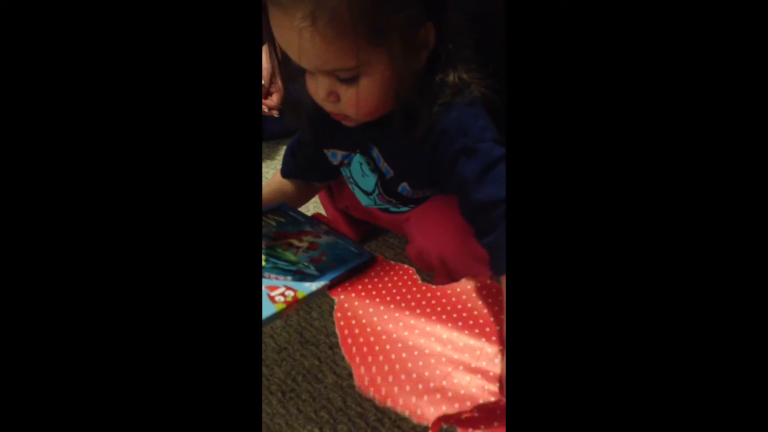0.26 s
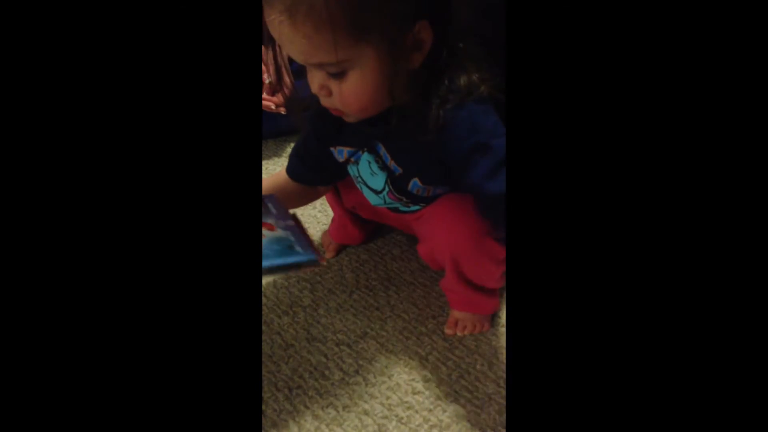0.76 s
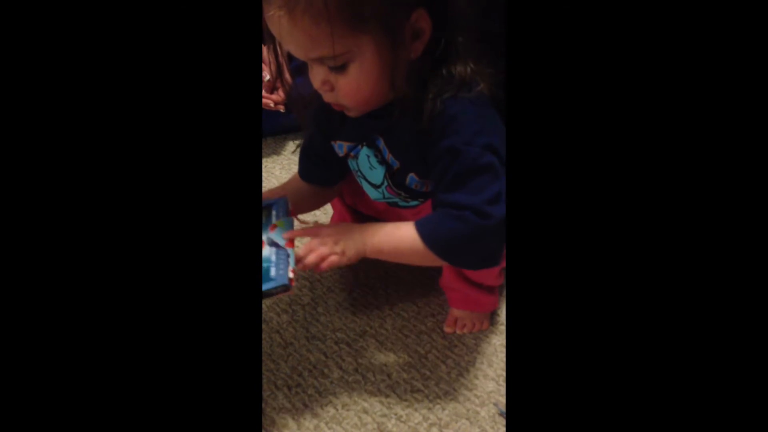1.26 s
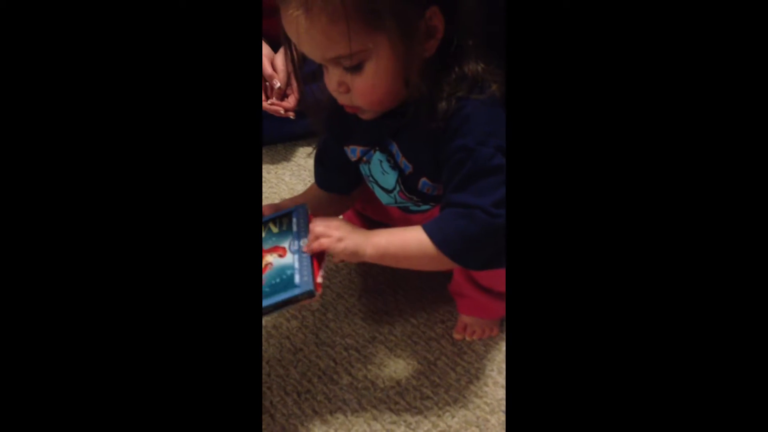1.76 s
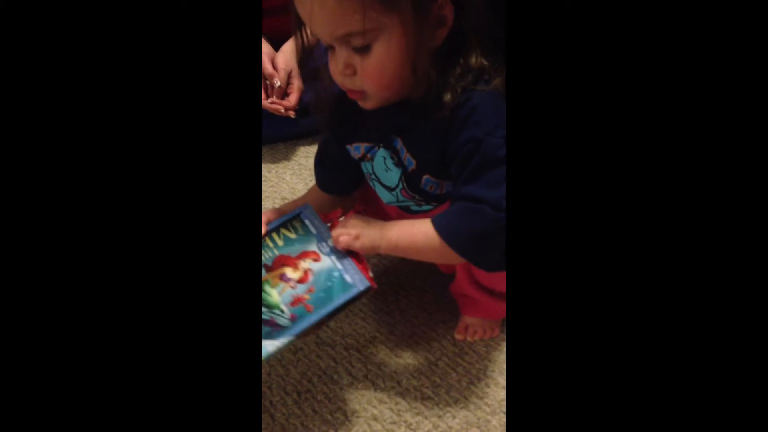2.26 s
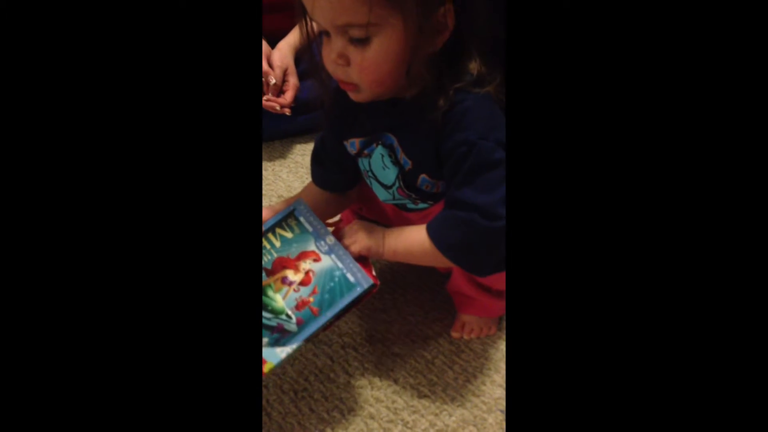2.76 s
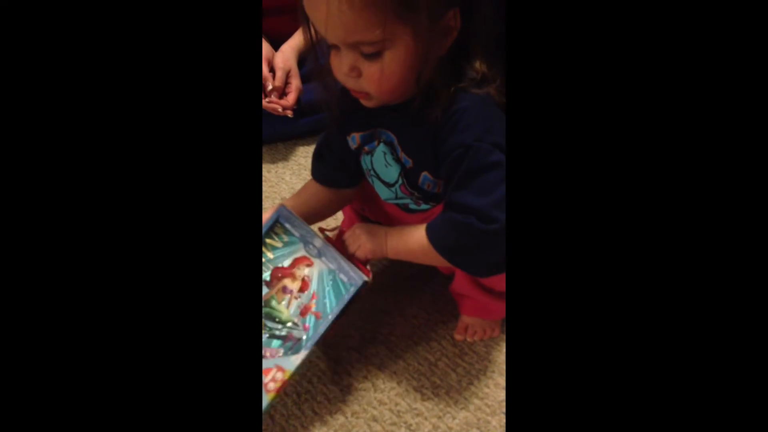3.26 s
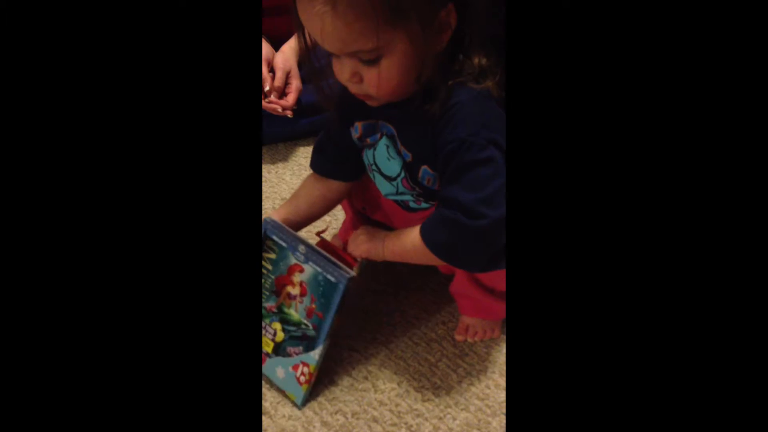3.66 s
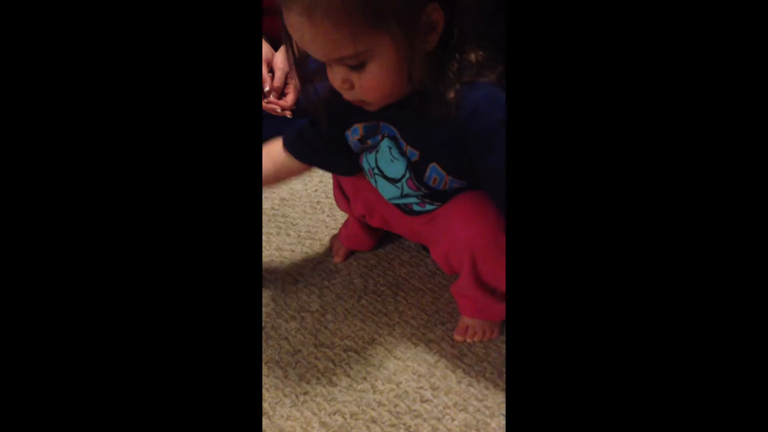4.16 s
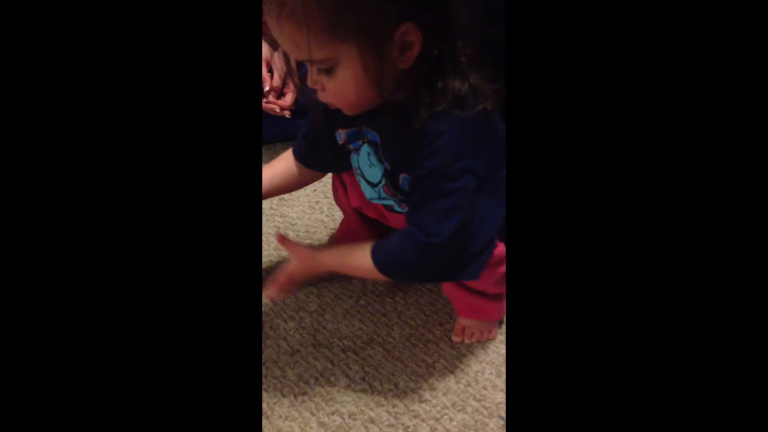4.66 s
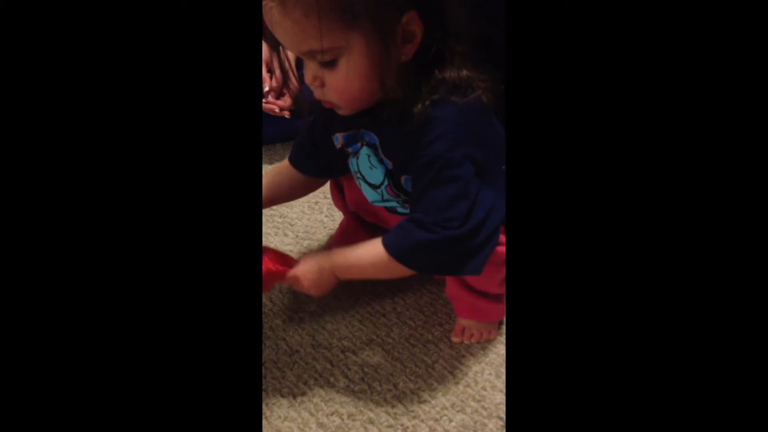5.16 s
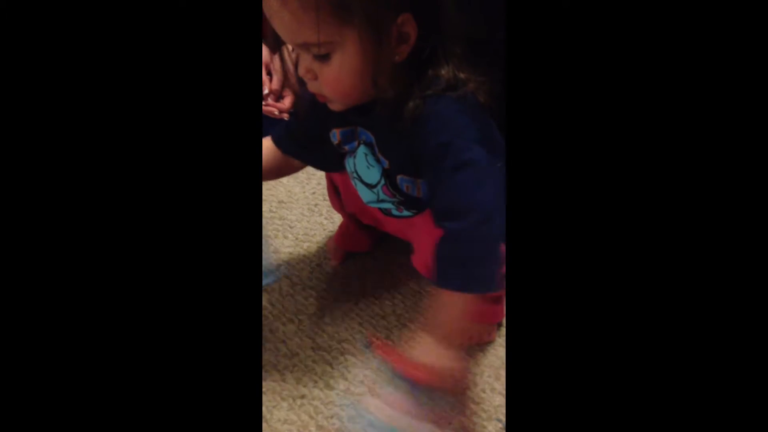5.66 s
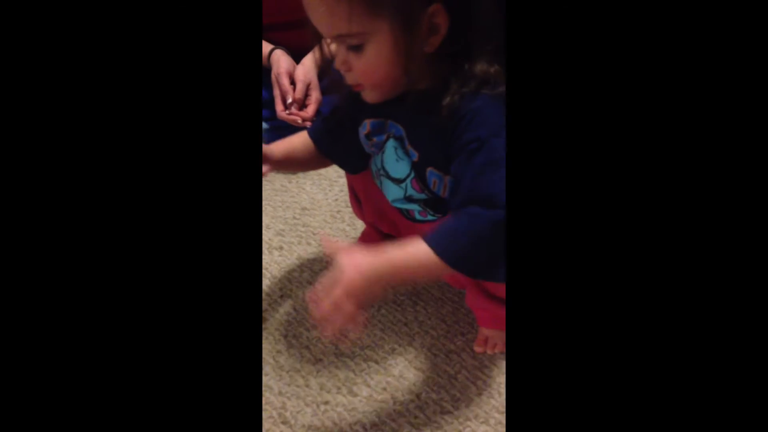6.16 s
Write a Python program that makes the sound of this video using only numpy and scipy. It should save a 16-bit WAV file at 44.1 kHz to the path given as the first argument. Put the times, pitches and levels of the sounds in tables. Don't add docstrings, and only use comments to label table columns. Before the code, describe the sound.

A quiet carpeted room with little echo, heard close on a phone: soft low appliance hum and faint hiss throughout. At 0.2 s a crease snaps, then at 0.3 s a very short, sharp paper rip with a dull box knock, over by 0.4. Near silence follows with tiny finger ticks; around 1.3 to 1.8 a soft low rumble of weight shifting on the floor. Crisp single snaps at 2.1 and 2.5, then a scatter from 2.9 to 3.8, the strongest near 3.2. At 3.9 to 4.05 comes a dense, bright tear with hollow thuds and a flapping sheet. Faint crinkles and ticks continue, with clearer snaps at 4.9 and 5.1. Two rips follow at 5.3 to 5.4 and 5.5 to 5.6, crackling and papery. Small taps and a low floor rumble near 5.8 fade, with one last snap at 6.1.

```python
import sys
import numpy as np
from scipy import signal
from scipy.fft import rfft, irfft
from scipy.io import wavfile
from scipy.ndimage import uniform_filter1d

SR = 44100
rng = np.random.default_rng(int(sys.argv[2]) if len(sys.argv) > 2 else 0)


def ratio_of_db(decibels):
    return 10 ** (np.asarray(decibels, float) / 20)


def wav_out(sig):
    wavfile.write(sys.argv[1], SR, np.round(np.clip(np.atleast_2d(sig).T, -1, 1) * 32767).astype(np.int16))


N = 283122
FIRM_DB = -35


def evened(x):
    return x / np.sqrt(np.mean(x ** 2) + 1e-20)


def read(points, hz):
    point_hz, value = np.transpose(points)
    return np.interp(np.log(hz + 1), np.log(point_hz + 1), value)


def add(mix, start_s, sound):
    part = mix[round(start_s * SR):][:len(sound)]
    part += sound[:len(part)]


def ring(x, hz, width_hz):
    radius = np.exp(-np.pi * width_hz / SR)
    return signal.lfilter([1 - radius], [1, -2 * radius * np.cos(2 * np.pi * hz / SR), radius ** 2], x)


def pull(t, start_s, rise_s, peak_db, swell_db, fade_s):
    u = t - start_s
    swelling = peak_db - swell_db * (1 - u / rise_s)
    fading = peak_db - 60 * (u - rise_s) / fade_s
    db = np.where(u < rise_s, swelling, fading)
    return np.where(u < 0, -200, np.maximum(db, -200))


# frequency in Hz, level in dB per Hz.
PAPER_SPECTRUM = [(71, -62), (120, -2.5), (498, -3.5), (748, -4.5), (881, -11), (1020, -7.5), (1320, -14.5),
                  (1650, -13), (2030, -6), (3970, -9.5), (5610, -8.5), (7010, -1), (8950, -14),
                  (12600, -25.5), (15500, -44)]


def paper_part(lo_hz, hi_hz):
    hz = abs(np.fft.fftfreq(4096, 1 / SR)) + 1
    slopes = (1 + (lo_hz / hz) ** 6) * (1 + (hz / hi_hz) ** 6)
    log_gain = np.log(ratio_of_db(read(PAPER_SPECTRUM, hz)) / np.sqrt(slopes) + 1e-5)
    phase = -signal.hilbert(log_gain).imag
    taps = np.fft.ifft(np.exp(log_gain + 1j * phase)).real[:2048]
    return taps / np.linalg.norm(taps)


def paper_parts():
    crackle = paper_part(4500, 9000)
    crackle = evened(crackle) + 0.5 * evened(ring(crackle, 7200, 970))
    sheet = paper_part(1200, 4500)
    box = paper_part(190, 1200)
    finest = signal.lfilter([1, -1.2, 0.6], [1], paper_part(9000, 30000))
    return [part / np.linalg.norm(part) for part in (crackle, sheet, box, finest)]


def breaks(per_s, spread_db, clump_db, clump_s):
    breaking = rng.random(N) < per_s / SR
    sign = rng.standard_normal(N)
    size = np.minimum(rng.exponential(1, N), 3)
    clump = evened(signal.lfilter([1], [1, -np.exp(-1 / (clump_s * SR))], rng.standard_normal(N)))
    return evened(breaking * sign * ratio_of_db(spread_db * size + clump_db * clump))


def through_paper(levels_db, per_s, spread_db, clump_db, clump_s, patchy_db):
    out = np.zeros(N)
    fibres = breaks(per_s, spread_db, clump_db, clump_s)
    for part, db in zip(paper_parts(), levels_db):
        signs = rng.choice([-1., 1.], N)
        out += signal.oaconvolve(fibres * signs * ratio_of_db(db), part)[:N]
    z = signal.stft(out, nperseg=128)[2]
    patches = uniform_filter1d(rng.standard_normal(z.shape), size=3, axis=0)
    patches = evened(uniform_filter1d(patches, size=7, axis=1))
    return signal.istft(z * ratio_of_db(patchy_db * patches), nperseg=128)[1][:N]


# start in seconds, pull in seconds, peak in dB, swell in dB, fade in seconds per 60 dB.
RIP_PULLS = [(.309, .022, -33.5, 0, 0.03), (0.33, .037, -25, 3, 0.01), (.369, .004, -39, 0.6, 0.0747),
             (2.043, .004, -59, 0.6, 0.2), (2.47, .038, -48.5, 17, 0.05), (3.847, .004, -45, 4, 0.25),
             (3.862, 0.018, -44, 9, 0.16), (3.893, .008, -28.5, 3, .08), (3.905, .108, -26, 6.5, .085),
             (4.198, .02, -54, 9, 0.18), (5.12, .018, -45, 25, 0), (5.309, .004, -31.5, -2, 0.09),
             (5.355, 0.066, -42.5, -2, 0.16), (5.505, .042, -27.5, 16, 0.1446),
             (5.609, .012, -32, 3.5, 0.077)]
# start in seconds, time to peak in seconds, peak in dB, swell in dB, fade in seconds per 60 dB.
SHEET_FLAPS = [
    (.33, 0.033, -36, 3, 0.07),
    (2.045, 0.023, -55.5, 1, 0.16),
    (3.9, 0.017, -31, 4, 0.1958),
    (3.939, 0.073, -33, 0, 0.1129),
    (4.05, .006, -49, 5, 0.08),
    (5.135, 0.019, -53, 2, 0.17),
    (5.292, 0.019, -45, 17, 0.24),
    (5.35, 0.028, -35, 9.5, 0.11),
    (5.512, 0.044, -29.5, 12.5, 0.1236),
    (5.675, 0.0068, -54.5, 4, .25),
]


def rips():
    t = np.arange(N) / SR
    crackle_db = np.max([pull(t, *row) for row in RIP_PULLS], axis=0)
    flap_db = np.max([pull(t, *row) for row in SHEET_FLAPS], axis=0)
    effort_db = crackle_db - FIRM_DB
    sheet_db = np.maximum(FIRM_DB - 7.5 + 0.9 * effort_db, flap_db)
    box_db = np.maximum(FIRM_DB - 12.5 + effort_db, flap_db - 5.5)
    finest_db = FIRM_DB - 23.5 + 1.25 * effort_db
    tear_loss_db = 4.0
    levels_db = np.array([crackle_db, sheet_db, box_db, finest_db]) - tear_loss_db
    return through_paper(levels_db, 9000, spread_db=2.2, clump_db=2.2, clump_s=0.002, patchy_db=3.2)


# time in seconds, crack peak in dB, sheet in dB relative to crack, sheet ring in Hz.
LONE_CREASES = [(.177, -32, -18, 2400), (2.0425, -40, -8, 3200), (2.0514, -46, -10, 3220),
                (2.0722, -45.5, -4, 2030), (2.0879, -21.5, -14, 1940), (2.5058, -31, -12.5, 2360),
                (2.9048, -37, -8, 3620), (3.158, -33, -9.5, 2830), (3.194, -47, -3.5, 3810),
                (3.1995, -36.5, -10, 1810), (3.2361, -21.5, -17, 2050), (3.2654, -41, -9.5, 2840),
                (3.4649, -45.5, -9, 2730), (3.5231, -30.5, -16, 2550), (3.5928, -38.5, -10, 2530),
                (3.679, -35, -12, 4160), (3.6854, -47, -2, 2640), (3.7964, -39.5, -7.5, 4150),
                (3.8001, -32.5, -28, 4150), (3.8074, -44, -15, 3130), (4.2173, -45, -20, 1950),
                (4.8739, -33.5, -14, 2600), (5.036, -44, -2, 1790), (5.0611, -40, -8, 2840),
                (5.1306, -32, -5, 2900), (5.1388, -34.5, -29, 1910), (5.4644, -41, -14, 3680),
                (5.4839, -42, -6, 2530), (5.7417, -41, -4.5, 1740), (6.115, -32.5, -6.5, 3600)]
# time in seconds, crack peak in dB, sheet in dB relative to crack, sheet ring in Hz.
TORN_CREASES = [(0.3081, -24, -17, 2020), (0.3332, -21.5, -8, 2070), (0.3585, -20, -11.5, 3700),
                (0.3655, -19, -12, 1760), (3.881, -23.5, -6.5, 2640), (3.884, -23.5, -12, 2010),
                (3.898, -34, -11, 2170), (3.9054, -24.5, -3, 2330), (3.923, -23, -7, 3390),
                (3.93, -24, -21, 2530), (3.9848, -27, -9, 3370), (3.996, -23, -30, 2060),
                (4.0054, -17, -10, 4220), (4.0105, -25, -5, 2500), (5.309, -26.5, -9, 3090),
                (5.3174, -33, -9, 2060), (5.328, -27.5, -27, 2620), (5.3384, -30, -15, 3300),
                (5.3578, -25, -7, 3680), (5.3792, -24.5, -0.5, 2160), (5.3864, -30, -13, 2000),
                (5.4, -27, -13, 2200), (5.5053, -30, -21, 1920), (5.5134, -28, -16, 2070),
                (5.5284, -30, 0, 2710), (5.5413, -20.5, -2.5, 1740), (5.5554, -20, -3, 2770),
                (5.5854, -32, -12, 2000), (5.6106, -27, -1.5, 2150), (5.6304, -27.5, -4, 2070)]
# time in seconds, crack peak in dB, sheet in dB relative to crack, sheet ring in Hz.
FINGER_TICKS = [(.1974, -52, -11, 1960), (.4594, -53.5, 6.5, 2400), (0.5896, -49, -10, 4090),
                (.6459, -54, -2, 1800), (.7976, -51.5, -13, 2690), (1.552, -47.5, -22, 2260),
                (1.7035, -53, -12, 2350), (1.7592, -50.5, -17, 2220), (2.77, -54.5, 3.5, 1850),
                (3.045, -48, -6, 2250), (3.559, -45, -11, 2710), (3.6124, -51, -15, 2030),
                (3.8471, -45, -7, 4190), (3.8602, -42.5, 4, 2760), (4.0858, -44.5, -4, 2250),
                (4.366, -53.5, -6, 1940), (4.7833, -51.5, 2.5, 2460), (4.8072, -51, -1, 2450),
                (4.8116, -46, 1, 1740), (4.8525, -46, -8, 2230), (5.027, -46, -2.5, 2770),
                (5.1154, -48.5, 0, 2820), (5.24, -48, 8, 1850), (5.252, -46, 10.5, 1960),
                (5.6494, -39, -12, 2820), (5.7164, -42, -5, 2270), (5.7997, -52.5, -9.5, 1780),
                (5.9289, -49, -2, 1900), (6.0525, -41.5, -8, 2400)]


def snaps():
    out, t = np.zeros(N), np.arange(900) / SR
    crackle, sheet, box, finest = paper_parts()
    rows = LONE_CREASES + TORN_CREASES + FINGER_TICKS
    for start_s, db, sheet_db, sheet_hz in rows:
        noise = rng.standard_normal(900)
        burst = noise * (t / 0.0006) ** 2 * np.exp(-t / 0.0004)
        slower = noise * (t / 0.001) ** 2 * np.exp(-t / 0.0011)
        crack_hz = 6950 * (1 + 0.098 * noise[0])
        crack = np.convolve(burst, crackle + ratio_of_db(-16.5) * finest)[:900]
        crack = evened(crack) + 0.51 * evened(ring(crack, crack_hz, 1250))
        flex = np.convolve(slower, sheet)[:900]
        flex = evened(flex) + 0.37 * evened(ring(flex, sheet_hz, 490))
        thud = np.convolve(slower, box)[:900]
        box_db = -13 + (0.56 - 1) * (db - FIRM_DB) + 0.3 * sheet_db
        for part, rel_db in zip((crack, flex, thud), (0, sheet_db + 1.0, box_db)):
            add(out, start_s - 0.0002, part / abs(part).max() * ratio_of_db(db + rel_db + 0.83))
    return out


# time in seconds, peak in dB, ring in Hz, t60 in seconds.
BOX_KNOCKS = [(0.315, -29, 315, 0.037), (1.325, -41, 249, 0.037), (5.78, -56, 334, 0.03),
              (0.176, -45, 580, 0.03), (2.505, -49.5, 650, 0.028), (3.158, -43, 460, 0.013),
              (3.237, -29.5, 455, 0.013), (3.861, -32, 584, 0.028), (3.972, -24.5, 527, 0.026),
              (4.011, -29, 500, 0.028), (5.31, -35, 770, 0.026), (5.377, -21, 614, 0.022),
              (.346, -31.5, 330, .035), (2.05, -46, 800, .012), (4.9, -47, 600, 0.014),
              (5.178, -44.5, 900, 0.0098), (5.266, -40, 480, 0.02), (5.742, -49, 700, .012),
              (5.796, -43, 900, 0.0091), (6.115, -45, 950, 0.011), (2.1695, -47, 1180, 0.009),
              (2.2199, -51, 2200, 0.009), (2.5394, -51, 1180, 0.0099), (3.49, -40, 2650, 0.011),
              (4.3246, -47.5, 929, 0.0083), (5.2674, -37, 2500, 0.009), (5.7418, -45, 1730, 0.009),
              (5.8102, -41.5, 1810, 0.016)]


def knocks():
    out, t = np.zeros(N), np.arange(3000) / SR
    for start_s, db, hz, t60_s in BOX_KNOCKS:
        contact = 0.22 * rng.standard_normal(3000) * np.exp(-t / 0.00098)
        mode = np.sin(2 * np.pi * hz * t) + contact
        onset = 1 - np.exp(-t / 0.00078)
        add(out, start_s, ratio_of_db(db - 60 * t / max(t60_s, 0.004)) * mode * onset)
    return out


# time in seconds, handling in dB.
HANDLING = [(0, -74), (.27, -72), (.5, -70), (1.5, -72), (3.02, -73.5), (3.6, -66.5), (4.06, -61.5),
            (4.27, -63.5), (4.5, -81), (4.79, -65.5), (5.08, -60.5), (5.2, -69), (5.27, -64), (5.47, -60),
            (5.6, -50), (5.72, -60), (5.88, -68.5), (6.42, -64)]


def rustle():
    calm_db = -70
    handling_db = np.interp(np.arange(N) / SR, *np.transpose(HANDLING)) - calm_db
    crackle_db = calm_db - 8.5 + handling_db
    sheet_db = calm_db - 4.5 + 0.44 * handling_db
    box_db = sheet_db - 1.5 + 0.14 * handling_db
    levels_db = crackle_db, sheet_db, box_db, crackle_db - 14.0
    return through_paper(levels_db, 5000, spread_db=-1.0, clump_db=1.0, clump_s=0.028, patchy_db=3.5)


# start in seconds, time to peak in seconds, peak in dB, fade in seconds per 60 dB.
BODY_SHIFTS = [
    (1.3, 0.17, -56, .85),
    (5.72, .075, -55.5, 2),
]


def shifts():
    t, floor_hz = np.arange(N) / SR, 199
    effort_db = np.max([pull(t, start_s, rise_s, peak_db, 11, fade_s)
                        for start_s, rise_s, peak_db, fade_s in BODY_SHIFTS], axis=0)
    rumble = ring(ring(rng.standard_normal(N), floor_hz, 60), floor_hz, 60)
    return ratio_of_db(effort_db - 2.0) * evened(rumble)


# frequency in Hz, t60 in seconds.
ROOM_T60 = [(250, 0.18), (700, 0.17), (2000, 0.19), (7000, 0.15), (12000, 0.12)]
# delay in seconds, level in dB.
EARLY_ECHOES = [(.0024, -12), (.0125, -24), (.0155, -25), (.022, -26), (.029, -27)]


def room(x):
    length = SR // 2
    taps, early = np.zeros(length), np.zeros(length)
    at = np.arange(300, length - 20, 20)
    taps[at + rng.integers(0, 20, len(at))] = rng.choice([-1., 1.], len(at))
    hz, t, z = signal.stft(taps, SR, nperseg=256)
    decay = ratio_of_db(-60 * t / read(ROOM_T60, hz)[:, None])
    tail = signal.istft(z * decay, SR, nperseg=256)[1][:length]
    for delay_s, db in EARLY_ECHOES:
        add(early, delay_s, ratio_of_db(db) * np.ones(1))
    response = early + ratio_of_db(-13) * tail / np.linalg.norm(tail)
    return x + signal.oaconvolve(x, response)[:N]


# frequency in Hz, level in dB per Hz.
AIR_SPECTRUM = [(15, -80), (25, -33), (86, -21.5), (101, -14), (122, -10), (173, -5.5), (193, -13),
                (233, -8), (367, -13.5), (409, -17), (443, -17.5), (719, -22.5), (780, -31.5), (2110, -29),
                (15400, -35)]
# frequency in Hz, level in dB, width in Hz.
MOTOR_LINES = [(119.8, -61, 0.14), (161.2, -64, 2.3), (321, -70.5, 24), (394, -75, 2.9), (412.7, -73, 2.2),
               (716, -90, 1.2), (2290, -83, 2.5)]


def house():
    frames, hz = N // 512 + 5, np.fft.rfftfreq(2048, 1 / SR)
    real, imag, patches = rng.standard_normal((frames, 1025, 3)).T
    patches_db = evened(uniform_filter1d(uniform_filter1d(patches, 16, 0), 8, 1))
    z = (real + 1j * imag) * ratio_of_db(read(AIR_SPECTRUM, hz)[:, None] + patches_db)
    out = ratio_of_db(-60.5) * evened(signal.istft(z, nperseg=2048, noverlap=1536)[1][:N])
    t = np.arange(N) / SR
    for line_hz, db, width_hz in MOTOR_LINES:
        waver = ring(ring(rng.standard_normal(N), line_hz, width_hz + 6), line_hz, width_hz + 6)
        steady = 2.4 * np.sin(2 * np.pi * line_hz * t)
        out += ratio_of_db(db) * evened(steady + evened(waver) * min(width_hz / 4, 1.5))
    return out


def scene():
    paper = room(rips() + rustle() + snaps() + knocks())
    bass_cut = signal.butter(3, 110, "highpass", fs=SR, output="sos")
    return (signal.sosfilt(bass_cut, paper) + shifts() + house())[None]


def top_cut(x):
    return signal.sosfilt(signal.butter(12, 15950, fs=SR, output="sos"), x)


def record(dry):
    in_band = np.fft.rfftfreq(N, 1 / SR) < 15440
    limited = irfft(rfft(dry) * in_band, N)
    return top_cut(limited)


dry = scene()
out = record(dry)
wav_out(out)
```